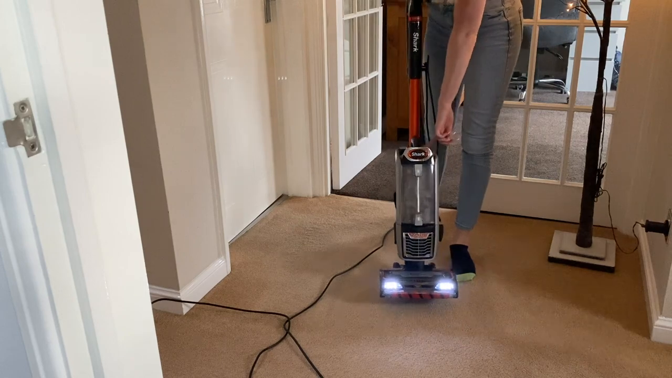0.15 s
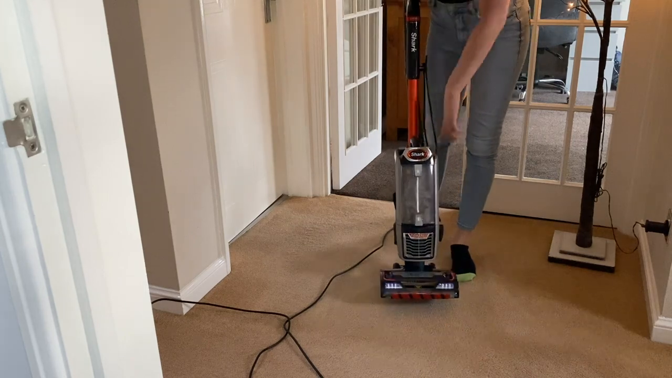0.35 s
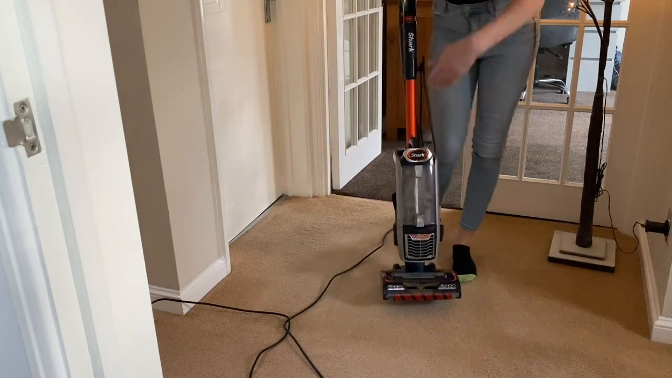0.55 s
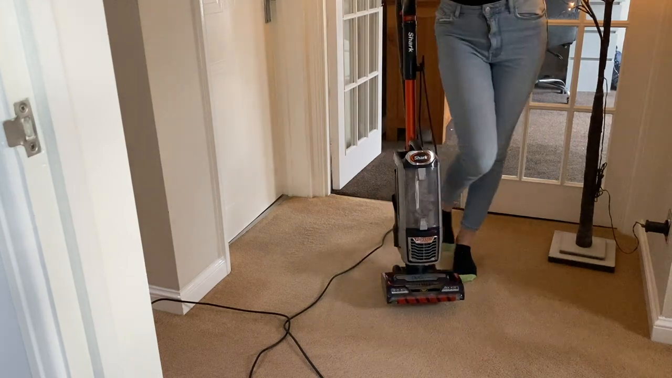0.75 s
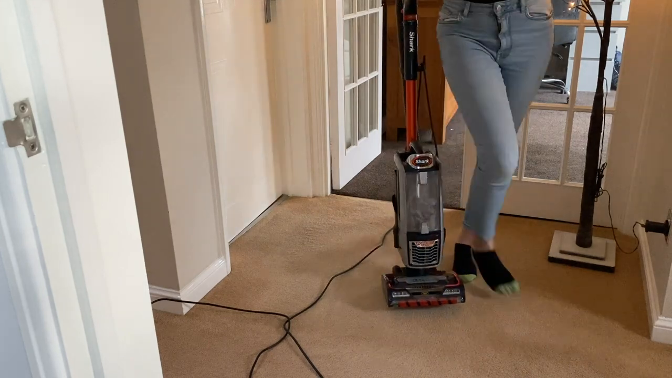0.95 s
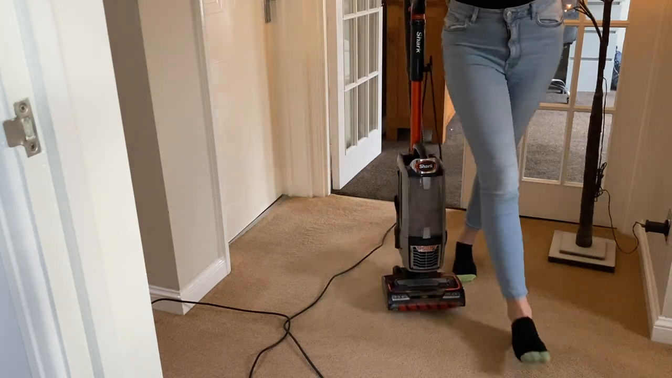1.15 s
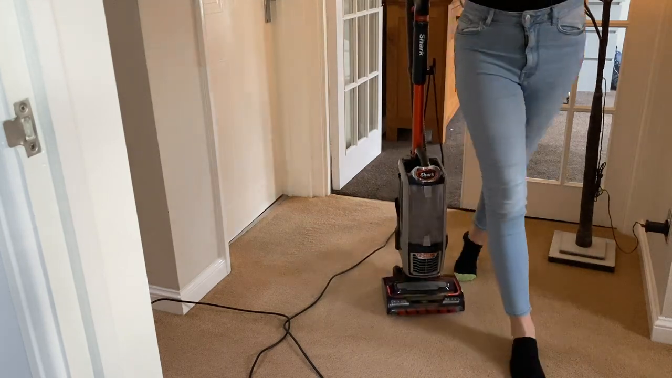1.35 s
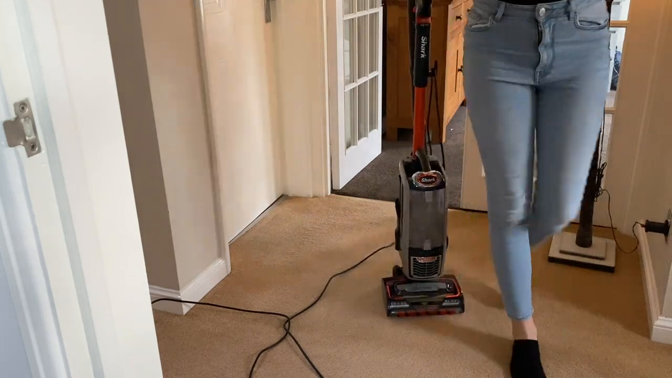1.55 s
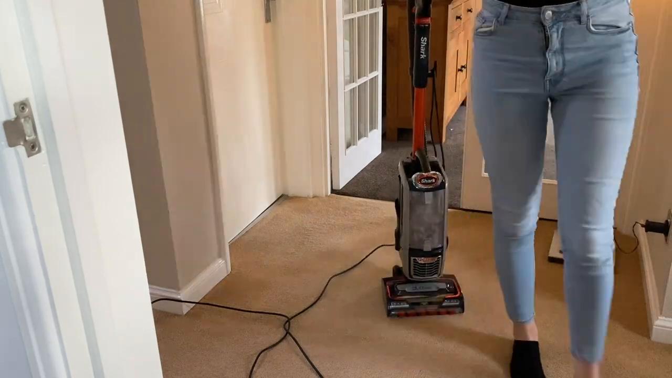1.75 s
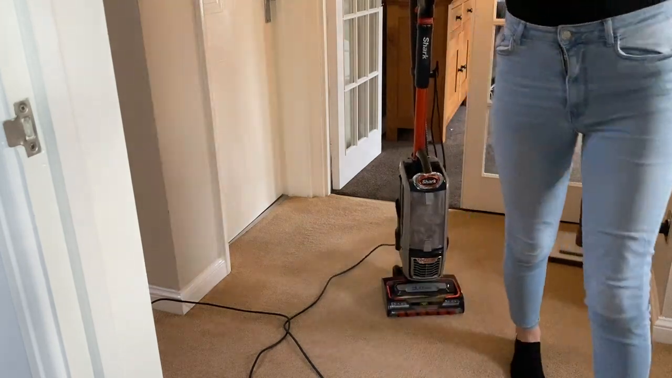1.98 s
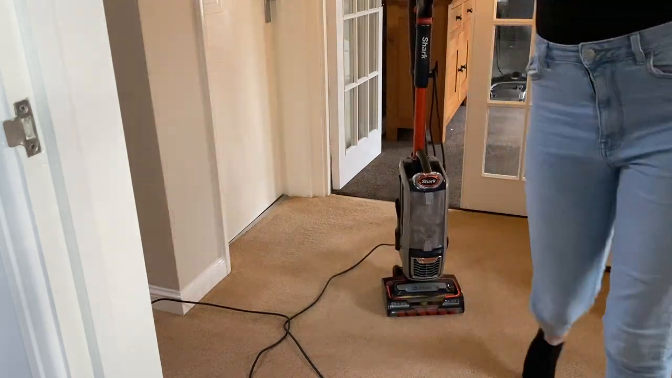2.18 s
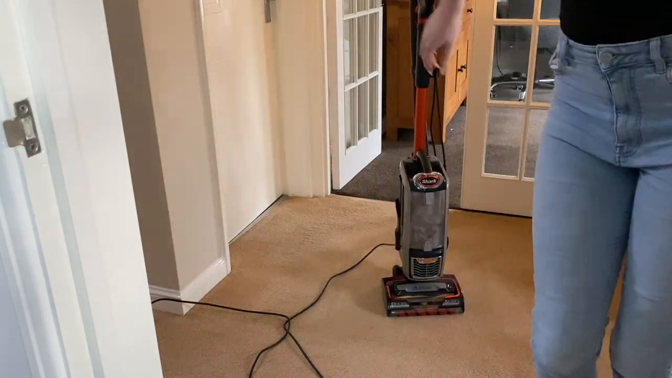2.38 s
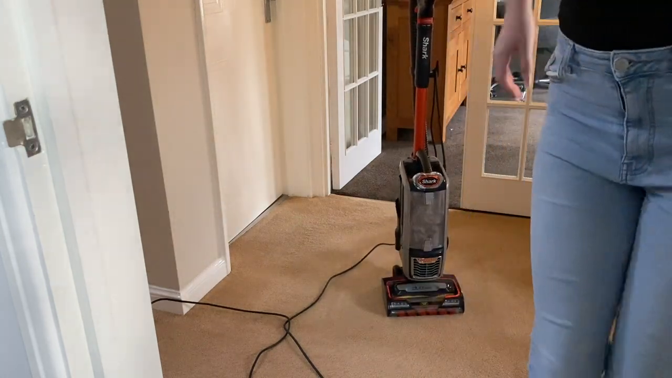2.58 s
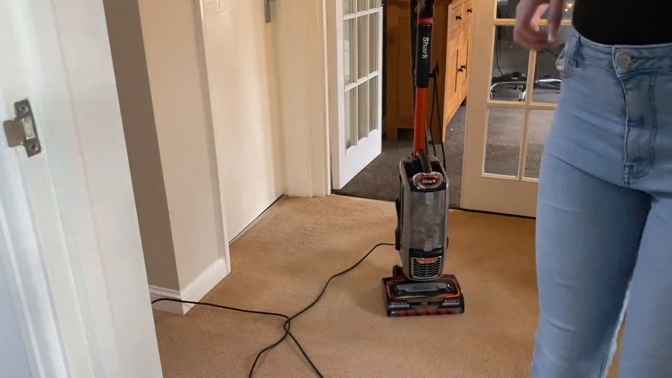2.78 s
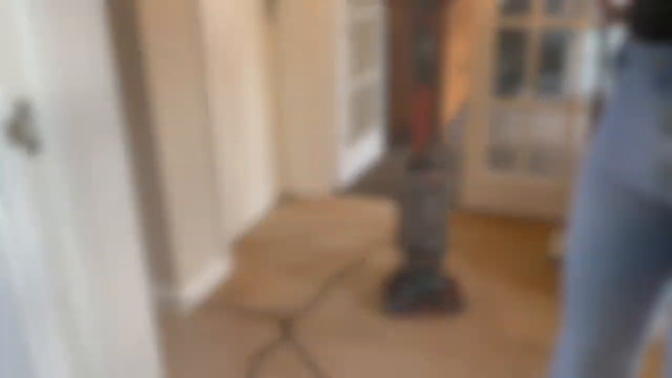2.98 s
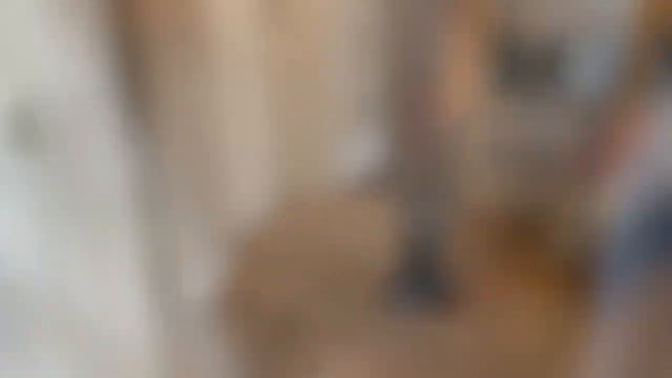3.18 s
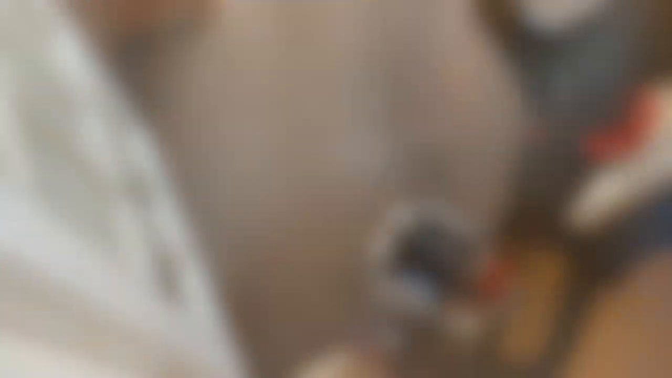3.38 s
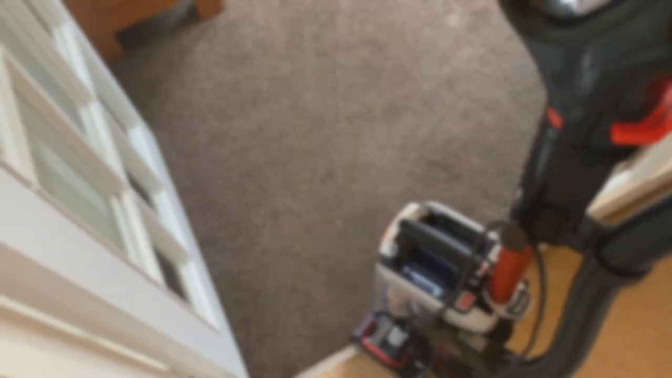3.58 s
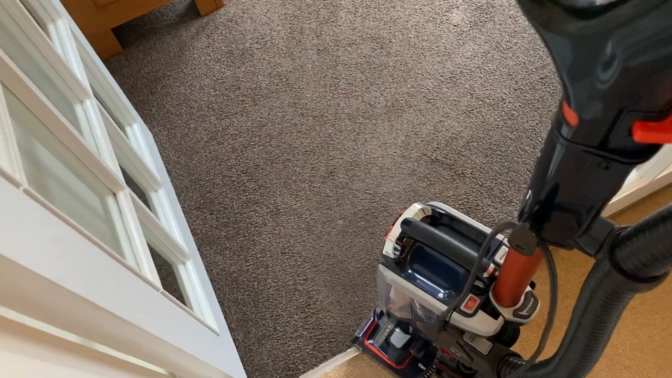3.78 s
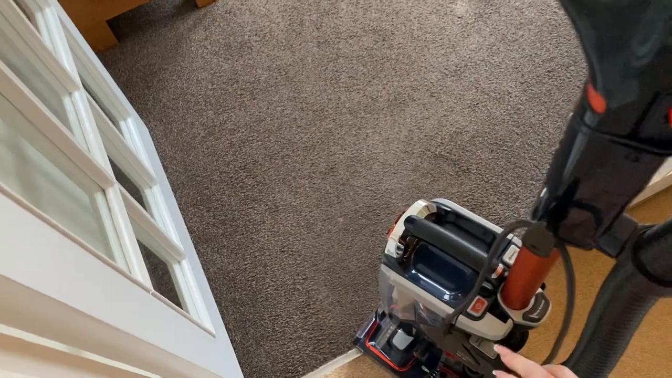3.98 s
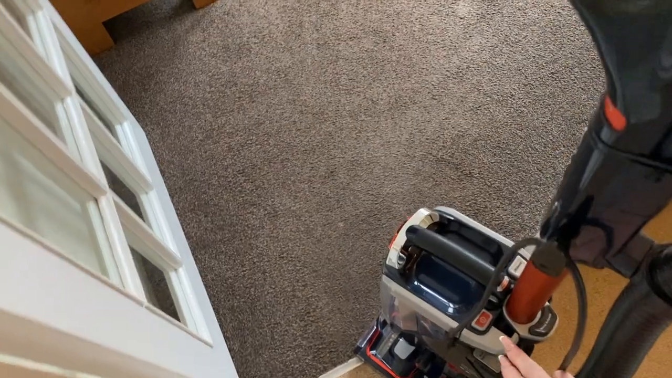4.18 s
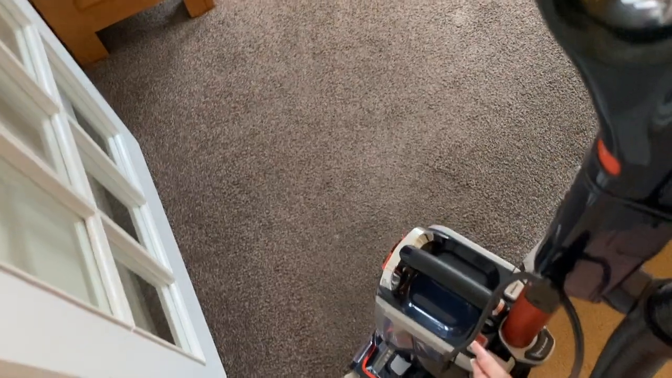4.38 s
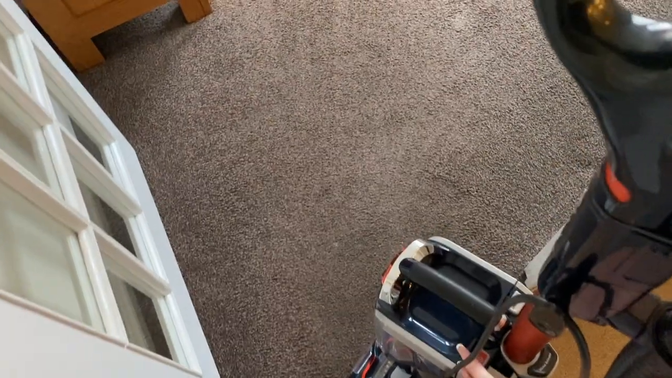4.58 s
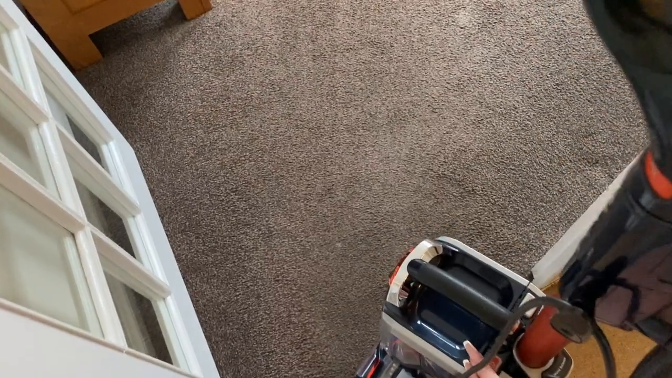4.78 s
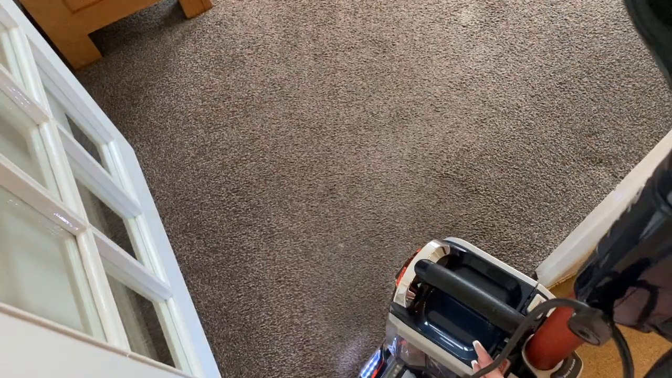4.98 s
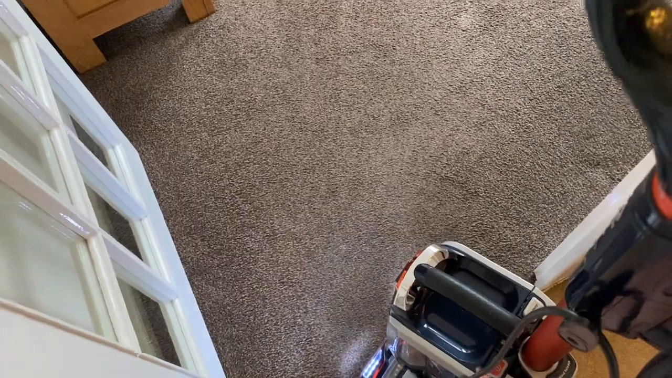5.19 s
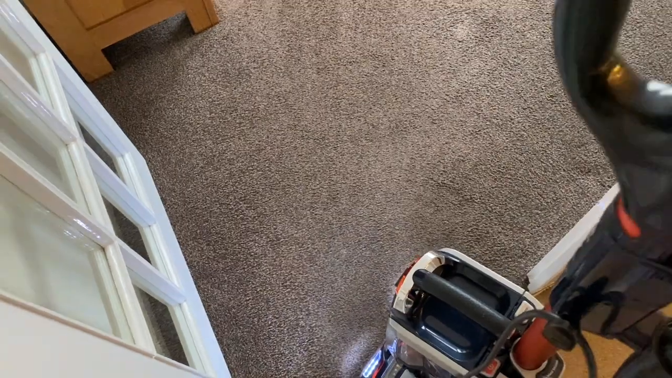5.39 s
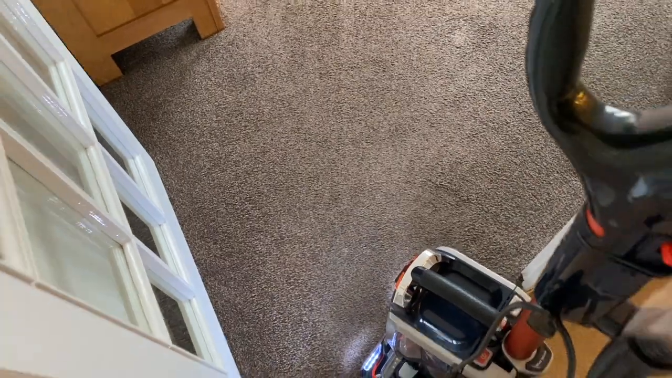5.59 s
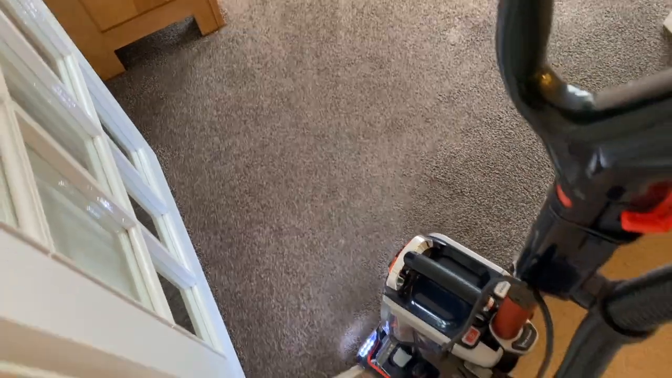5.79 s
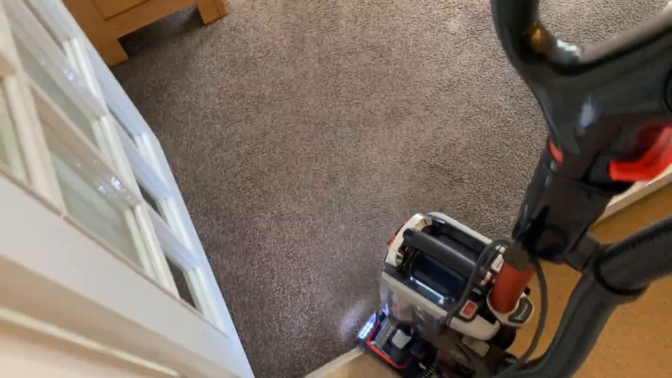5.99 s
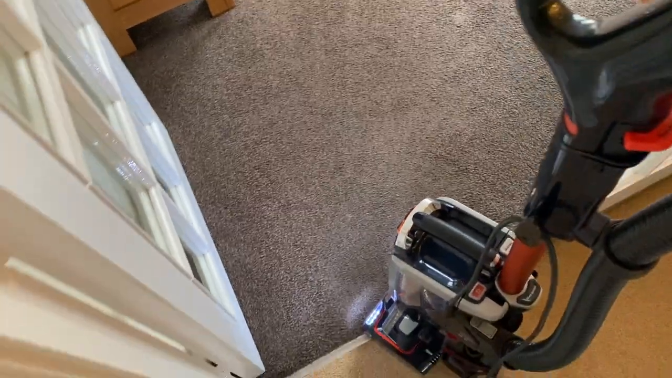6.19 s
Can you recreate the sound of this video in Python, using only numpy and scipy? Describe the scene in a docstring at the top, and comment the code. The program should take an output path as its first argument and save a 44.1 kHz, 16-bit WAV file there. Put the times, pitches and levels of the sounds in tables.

```python
"""An upright vacuum cleaner runs across a carpeted landing; switched off, its fan, rotor and air noise coast down
together, each tone tied to the shaft speed and each noise layer's level to it.
Jeans swish (grainy noise), a foot lands softly and something scuffs; then the switch clicks, plastic ringing.
The motor jolts into life and runs up to full speed, now heard from close above, with mains hum and rattle.
The still house lies beneath, as shaped noise."""
import sys
import numpy as np
from scipy import signal
from scipy.fft import rfft, irfft
from scipy.io import wavfile

SR = 44100
rng = np.random.default_rng(int(sys.argv[2]) if len(sys.argv) > 2 else 0)


def dump_mix(stems):
    """Bounce the given channels to the path in sys.argv[1] as a 16-bit WAV at rate SR."""
    frames = np.atleast_2d(stems).T  # one column per channel
    limited = np.clip(frames, -1, 1)  # hard clip at full scale
    pcm = np.round(limited * 32767).astype(np.int16)
    wavfile.write(sys.argv[1], SR, pcm)


N = 275625
T = np.arange(N) / SR
HZ = np.maximum(np.arange(N // 2 + 1) * SR / N, 1)
CUTOFF_HZ = 15900  # top of the microphone's range
SWITCH_OFF_S, SWITCH_ON_S = 0.1795, 4.801
# shaft speed before the switch-off (also the reference for levels), and after the restart
FULL_SPEED_HZ, RESTART_SPEED_HZ = 710.7, 714.7
BLADES = 9

# how alike left and right are, from across the landing and from close above: [f/Hz, likeness 0-1]
FAR_LIKENESS = [(130, 0.7), (300, 0.87), (640, 0.73), (1400, 0.74), (3100, 0.7), (6800, 0.14), (15000, 0)]
NEAR_LIKENESS = [(110, 1), (200, 0.94), (380, 0.63), (700, 0.079), (1300, 0.01), (2400, 0.27), (4400, 0.66),
                 (8000, 0.003), (15000, 0.13)]


def from_db(db):
    """Decibels to gain."""
    return 10 ** (np.asarray(db) / 20)


def rms_one(x):
    """Scale to unit power."""
    return x / np.sqrt(np.mean(x ** 2) + 1e-20)


def at_hz(points, hz=HZ):
    """Read a spectrum on a log-frequency axis."""
    f, value = np.transpose(points)
    return np.interp(np.log(hz), np.log(f), value)


def peaks_db(modes, at=HZ):
    """The lift, or cut where negative, that a set of resonances gives at each frequency, in dB."""
    return sum(db / (1 + (2 * (at - hz) / width) ** 2) for hz, width, db in modes)


def colour(x, gain):
    """Filter by a gain per frequency."""
    return irfft(rfft(x) * gain, N)


def drift(rate_hz):
    """Random wavering, mostly slower than the given rate; spread 1."""
    return rms_one(colour(rng.standard_normal(N), 1 / (1 + (HZ / rate_hz) ** 2)))


def noise(spectrum_db, likeness):
    """Stereo noise of a given colour and left-right likeness; rms 1."""
    mid, side = rfft(rng.standard_normal((2, N)))
    alike = np.clip(at_hz(likeness), -.99, .99)
    both = np.sqrt(1 + alike) * mid + np.sqrt(1 - alike) * side * [[1], [-1]]
    return rms_one(irfft(both * from_db(spectrum_db), N))


def balance(x, left_minus_right):
    """Share a level difference between the ears, half up on one and half down on the other."""
    return colour(x, from_db(at_hz(left_minus_right) * [[.5], [-.5]]))


def fall(age, t60):
    """Steady decay by 60 dB in t60 seconds."""
    return np.exp(-np.log(1000) * age / t60)


def dying(start, t60, rise):
    """Envelope of a blow: a quick rise (time constant in s), then a steady decay."""
    age = np.maximum(T - start, 0)
    return (1 - np.exp(-age / rise)) * fall(age, t60)


def landing(x, wet_db, t60=.33):
    """Direct sound plus dense wall reflections, different at each ear, which blur and flutter gliding tones."""
    age = T[:SR // 2]
    walls = rng.standard_normal((2, len(age))) * fall(age, t60) * (age > .003)
    # the walls dull the treble
    walls = signal.lfilter(*signal.butter(1, 6500, fs=SR), walls)
    walls *= from_db(wet_db) / np.sqrt(np.sum(walls ** 2, axis=1, keepdims=True))
    reflected = signal.fftconvolve(np.atleast_2d(x), walls, axes=1)[:, :N]
    return (x + reflected) / np.sqrt(1 + from_db(wet_db) ** 2)


def still_house():
    """The quiet of the house: steady noise, strongest in the bass."""
    # colour of the house [f/Hz, level/dB per Hz]
    house_air = [(25, -9.5), (60, 4.5), (120, -5.5), (250, -12.5), (500, -18), (900, -26), (4000, -31.5),
                 (11000, -30), (15000, -31)]
    return from_db(-70.5) * noise(at_hz(house_air), FAR_LIKENESS)


def footfall():
    """Heel, sole and toes strike the carpeted boards: three short bursts of low noise."""
    # heel, sole and toes [t/s, level/dB, t60/s]
    contacts = [(3.528, -46, 0.074), (3.547, -50.5, 0.14), (3.574, -59.5, 0.17)]
    # the boards under the carpet [f/Hz, level/dB per Hz]
    boards = [(40, -10), (110, 10.5), (220, 13), (330, 4), (520, -5.5), (900, -23), (2000, -50)]
    blows = sum(from_db(db) * dying(s, t60, rise=0.0018) for s, db, t60 in contacts)
    return blows * noise(at_hz(boards), NEAR_LIKENESS)


def tread():
    """The floor rumbles under the walker's weight, fading for a second until they stand still at 4.26 s."""
    walking = np.clip((4.26 - T) / 1, 0, 1)
    # colour of the rumble [f/Hz, level/dB per Hz]
    floor = [(12, -23.5), (30, 0.0), (55, 1), (100, -3.5), (250, -43.0), (1000, -68.5)]
    return from_db(-68.5) * walking * noise(at_hz(floor), FAR_LIKENESS)


def jeans():
    """Denim rubs on denim: noise that swells with each stroke, grainy as the weave catches and slips."""
    # strokes [t/s of the peak, level/dB, swell or fade/s]
    strokes = [(1.53, -62, 0.018), (2.3, -70.5, 0.17), (2.6, -65, 0.049), (2.87, -75, 0.086),
               (3.12, -77, 0.07), (3.77, -72, 0.103), (3.91, -66.5, 0.11), (4.33, -73.5, 0.049)]
    # colour of the cloth [f/Hz, level/dB per Hz]
    denim = [(650, -11.5), (1000, -3.5), (2000, -2), (4000, -4), (7000, -7.5), (11000, -5.5),
             (15000, -14.5)]
    power = sum((from_db(db) / (1 + ((T - s) / swell) ** 2)) ** 2 for s, db, swell in strokes)
    grain = from_db(1.3 * drift(70))
    return np.sqrt(power) * grain * noise(at_hz(denim), NEAR_LIKENESS)


def scuff():
    """Something slides close by: friction noise in one resonance that falls through the stroke."""
    peak_s, swell_s, level_db = 3.895, 0.045, -70
    centre_hz, width_hz, fall_hz_per_s = 1060, 260, 3300  # centre at the peak
    phase = 2 * np.pi * np.cumsum(centre_hz - fall_hz_per_s * (T - peak_s)) / SR
    band = drift(width_hz / 2) * np.sin(phase) + drift(width_hz / 2) * np.cos(phase)
    stroke = np.exp(-((T - peak_s) / swell_s) ** 2)
    return landing(from_db(level_db) * stroke * band, wet_db=-6)


def clicks(rows, modes):
    """Each snap is a brief noise burst that leaves the struck plastic ringing in its modes."""
    # colour of a snap on the shell [f/Hz, level/dB per Hz]
    shell = [(100, -39.5), (400, -9), (900, 1.5), (2200, 8.5), (3600, 6), (5500, -4.5), (7500, -1.5),
             (12000, -4.5), (16000, -21)]
    tilt_from_hz, strike_spread_db = 700, 2.5
    octaves_up = np.log2(np.maximum(HZ, tilt_from_hz) / tilt_from_hz)
    age = T[:SR // 5]
    out = 0
    for s, db, tilt_db, t60, ring_db in rows:
        snap = dying(s, t60, rise=0.00023) * noise(at_hz(shell) + tilt_db * octaves_up, NEAR_LIKENESS)
        first = int(s * SR)
        for hz, mode_db, mode_t60 in modes:
            # a random start, and up to half a cycle more at each ear
            phase = 2 * np.pi * (hz * age + rng.random() + rng.random((2, 1)) / 2)
            # each snap excites the modes a little differently
            strike = from_db(ring_db + mode_db + strike_spread_db * rng.standard_normal())
            snap[:, first:first + len(age)] += strike * fall(age, mode_t60) * np.sin(phase)
        out = out + from_db(db) * snap
    return landing(out, wet_db=-8.5, t60=0.28)


def switch():
    """Switch and plastic parts snap against the shell; the button springs back when let go."""
    # snaps, then button releases [t/s, level/dB, treble tilt/dB per octave, t60/s, ring/dB re snap]
    snaps = [(0.171, -33.5, 5, 0.19, -28), (1.812, -54, 0, 0.11, -23), (3.276, -70, 6, 0.045, -27),
             (4.179, -67.5, -12, 0.14, -22), (4.6025, -31.5, -1.5, 0.027, -14),
             (4.607, -44, -6, 0.028, -17), (4.622, -41.5, -8, 0.082, -15), (4.901, -28.5, 4, 0.03, -8.5),
             (5.05, -16.5, 1, 0.022, -27), (5.072, -26.5, -1.5, .03, -13), (5.998, -33, 2, .02, -31.5)]
    releases = [(4.713, -50, -7, 0.03, -13), (4.717, -47, -5.5, 0.021, -8)]
    # modes of the shell, then of the button [f/Hz, level/dB, t60/s]
    shell_modes = [(673, -15, 0.2), (883, -4, 0.17), (1230, -14, .09), (1642, -9, .24), (1798, -8, 0.14),
                   (2099, 1, 0.13), (2272, -5, 0.17), (2466, -11, 0.16), (3058, -8, 0.14),
                   (3200, -10, 0.12), (3750, -14, 0.08), (4167, -17, 0.12)]
    button_modes = [(1023, -9, .2), (1250, -3, .05), (1357, -5, .12), (1480, 0, .17), (2030, -4, .08),
                    (2207, -7, .15), (3100, -1, .04), (3650, -6, .035)]
    return clicks(snaps, shell_modes) + clicks(releases, button_modes)


def coast_speed():
    """Shaft Hz once the power is cut: air drag slows it at first, steady friction later."""
    drag_balance_hz, coast_s = 224.7, 3.3287  # speed where drag equals friction; time scale of slowing
    angle = np.arctan(FULL_SPEED_HZ / drag_balance_hz) - np.maximum(T - SWITCH_OFF_S, 0) / coast_s
    return np.maximum(drag_balance_hz * np.tan(angle), 50)


def start_speed():
    """Shaft Hz once the power is on: a quick pull and a slow settling close in on full speed."""
    # stages of the run-up [share of full speed, time constant/s]
    stages = [(.44, .038), (.52, .175), (.04, .38)]
    age = np.maximum(T - SWITCH_ON_S, 0)
    missing = sum(share * np.exp(-age / s) for share, s in stages)
    return np.maximum(RESTART_SPEED_HZ * (1 - missing), 50)


def by_speed(law, shaft_hz):
    """Gain of a layer that loses a set number of dB each time the speed halves."""
    db, loss_db = law
    return from_db(db + loss_db * np.log2(shaft_hz / FULL_SPEED_HZ))


def turning(shaft_hz, wobble):
    """Count the turns of a shaft whose speed wavers by a small share."""
    return np.cumsum(shaft_hz * (1 + wobble * drift(25))) / SR


def overtone(turns, shaft_hz, k):
    """A sine that sounds k times a turn; rms 1, fading out over the 2 kHz below the cutoff."""
    in_range = np.clip((CUTOFF_HZ - k * shaft_hz) / 2000, 0, 1)
    return np.sqrt(2) * np.sin(2 * np.pi * k * turns) * in_range


def airflow(shaft_hz, levels, spectrum, ducts, likeness, surge=0):
    """Turbulence coloured by the ducts: rumble at the floor head, rush in the bin, hiss at the exhaust."""
    air = noise(at_hz(spectrum) + peaks_db(ducts), likeness)
    low = 1 / (1 + (HZ / 220) ** 6)
    high = 1 / (1 + (2500 / HZ) ** 6)
    parts = {"rush": 1 - low - high, "rumble": low, "hiss": high}
    out = 0
    for name, part in parts.items():
        gain = by_speed(levels[name], shaft_hz) + surge * from_db(levels[name][0])
        out = out + gain * rms_one(colour(air, part))
    return out


def rotor(turns, shaft_hz, levels, wet_db, low_wet_db, scrape):
    """Unbalance sounds once a turn, the bearing sings, and a knock each turn rings the housing."""
    # resonances of the motor housing [f/Hz, width/Hz, level/dB]
    housing_modes = [(1124, 120, -14), (1722, 120, -10), (1925, 60, -3), (2022, 40, 0.5), (2193, 120, 2.5),
                     (2302, 51, 0.5), (2430, 89, -16), (2615, 120, -14.5), (2975, 170, -15.5)]
    # scrape of the carbon brushes [f/Hz, level/dB per Hz]
    brush_colour = [(400, -30), (800, -4.5), (1150, -11.5), (1600, -12.5), (2050, -4), (2300, 0.5),
                    (2600, -9), (3200, -13), (6000, -30.5)]
    # resonances of the body and of the bearing's seat, crossed by the tones [f/Hz, width/Hz, lift/dB]
    body = [(137.8, 7.6, 16), (152, 15, 19.5), (225, 95, 7), (330, 19, 11.5), (638, 52, 8)]
    bearing_seat = [(687, 52, 19.5), (960, 340, 23)]
    # relative overtones of the knock at each turn [multiple of shaft speed, level/dB]
    knock_overtones = [(3, -15), (6, -10), (7, 2), (8, 6.5), (9, -10), (10, 8), (11, 1), (12, 1), (13, 3),
                       (14, -2), (15, 0), (16, -4), (17, -4), (20, -12), (21, -12), (22, -4), (24, -12),
                       (33, -14)]
    bearing_order = 4.35  # cycles a turn

    def through(modes, k):
        """A shaft tone that swells as it crosses resonances."""
        return from_db(peaks_db(modes, k * shaft_hz)) * overtone(turns, shaft_hz, k)

    level = {name: by_speed(law, shaft_hz) for name, law in levels.items()}
    # the knock is uneven, so neighbouring overtones flare and fade at different moments
    flares = [from_db(1.5 * drift(14)) for _ in range(5)]
    knocks = sum(from_db(at_hz(knock_overtones, k)) * flares[k % 5] * overtone(turns, shaft_hz, k)
                 for k in range(3, 34))
    knocks = rms_one(knocks * np.sqrt(shaft_hz))
    ringing = sum(from_db(db) / (1 + (2 * (HZ - hz) / width) ** 2) for hz, width, db in housing_modes)
    # an irregular scrape, which takes over as the shaft slows
    rubbing = rms_one(colour(rng.standard_normal(N), from_db(at_hz(brush_colour))))
    brushes = scrape * np.sqrt(FULL_SPEED_HZ / shaft_hz) * rubbing
    housing = level["housing"] * from_db(-6.0) * (rms_one(colour(knocks, ringing)) + brushes)
    unbalance = level["unbalance"] * through(body, 1)
    bearing = level["bearing"] * through(bearing_seat, bearing_order)
    return landing(housing, wet_db, t60=0.25) + landing(unbalance + bearing, low_wet_db)


def whine(turns, shaft_hz, gains, flutter_db, flutter_hz, lag_s):
    """The fan blades' tone and its overtones, each fluttering, a little later at the left ear."""
    at_ears = turns - shaft_hz * lag_s * np.array([[1], [0]])
    partials = 0
    for k, gain in enumerate(gains, 1):
        flutter = from_db(flutter_db * drift(flutter_hz))
        partials = partials + gain * flutter * overtone(at_ears, shaft_hz, BLADES * k)
    # the blades stop whining below a shaft speed of about 97 Hz
    return partials / (1 + (97 / shaft_hz) ** 16)


def coasting():
    """The machine across the landing: it runs, loses power and slows to rest; the walls blur its whine."""
    # colour of the air noise [f/Hz, level/dB per Hz]
    far_air = [(30, -27.5), (60, -11.5), (110, -14), (170, -5.5), (350, -2), (600, -5), (1100, -6),
               (1800, -9), (2600, -11), (4500, -18), (7000, -17), (11500, -21), (15000, -39.5)]
    # resonances of ducts, bin, exhaust and room [f/Hz, width/Hz, lift/dB]
    far_ducts = [(148.4, 15, 14), (234.2, 7.5, 12), (353.4, 45, 8.5), (442, 25, 1), (600.4, 26, 5.5),
                 (908, 44, 3), (1080, 420, 3.5), (1540, 11, 10.5), (2570, 58, 6.5), (4410, 1200, 10.5)]
    # left minus right [f/Hz, difference/dB]
    far_balance = [(60, -0.5), (150, -2.5), (380, -1), (950, -2), (2380, 2.5), (5980, 2.5), (15000, -2)]
    # blade tone and its overtones in order, ahead of the fan case [level/dB at full speed, dB lost per halving]
    far_whine = [(-62, 7), (-69.5, -0.5), (-73.5, 2.5), (-79, 1.5), (-77.5, 5), (-83, 6)]
    # peaks and nulls of the fan case [f/Hz, width/Hz, lift/dB]
    fan_case = [(1970, 260, 5), (2360, 180, 13), (2620, 76, -5), (3000, 140, -9), (3700, 130, -2),
                (4270, 800, 14), (5800, 600, -5), (8000, 1600, 3.5), (10700, 1700, 15.5), (12820, 150, 10),
                (14600, 2800, -11)]
    # layers ahead of resonances and housing cut: name: [level/dB at full speed, dB lost per halving]
    far_levels = {"rush": (-30.5, 13.18), "rumble": (-45.5, 11.3), "hiss": (-44, 15.36),
                  "unbalance": (-45.5, 13.1), "bearing": (-69, 6.6), "housing": (-51, 2.34)}
    shaft_hz = coast_speed()
    turns = turning(shaft_hz, wobble=.0009)
    air = airflow(shaft_hz, far_levels, far_air, far_ducts, FAR_LIKENESS)
    motor = rotor(turns, shaft_hz, far_levels, wet_db=-5.5, low_wet_db=-9.5, scrape=0.19)
    gains = []
    for k, law in enumerate(far_whine, 1):
        partial_hz = BLADES * k * shaft_hz
        gain = by_speed(law, shaft_hz) * from_db(peaks_db(fan_case, partial_hz))
        if k >= 3:  # the case passes these only above about 6.2 kHz
            gain = gain / (1 + (6200 / partial_hz) ** 6)
        gains.append(gain)
    blades = whine(turns, shaft_hz, gains, flutter_db=2.2, flutter_hz=35, lag_s=1.2e-5)
    blades = landing(blades, wet_db=-1.5, t60=.28)
    # the last rub of the rotor dies away over 0.56 s
    to_rest = np.clip((3.58 - T) / 0.56, 0, 1)
    return balance(air + motor + blades, far_balance) * to_rest


def starting():
    """The machine from above: the inrush of current hums and jolts the body while the fan gathers speed."""
    # colour of the air noise [f/Hz, level/dB per Hz]
    near_air = [(30, -29.5), (55, -4), (90, -4.5), (200, -2.5), (350, -4), (600, -5), (1100, -7.5),
                (2000, -10.5), (3200, -11), (5000, -13.5), (7500, -18.5), (11500, -20.5), (15000, -31)]
    # resonances of ducts, bin, exhaust and room [f/Hz, width/Hz, lift/dB]
    near_ducts = [(80.5, 15, 11), (155.4, 24, 10.4), (195.4, 14, 6.5), (315, 21.6, 6.1), (370, 54, 6.7),
                  (509.3, 22, 9.8), (694, 55, 4.3), (936, 29, 7.1), (1430, 250, 3.2), (1980, 160, 4.1),
                  (2360, 51, 5.6), (2890, 59, 1.6)]
    # left minus right [f/Hz, difference/dB]
    near_balance = [(35, -2), (80, -3), (130, 3), (290, -3.5), (640, -1), (1410, 1.5), (3100, 2.5),
                    (6820, 1.5), (15000, -1)]
    # the whistle swells and fades as the microphone moves over the machine
    # [t/s, blade tone level/dB, its octave's level/dB]
    near_whine = [(4.82, -68, -68), (4.885, -66, -52), (4.91, -66, -60), (4.945, -61, -51.5),
                  (5.06, -48.5, -54), (5.13, -63, -58), (5.23, -65, -48.5), (5.32, -54, -53),
                  (5.47, -55, -64), (5.59, -49.5, -58), (5.7, -56, -55), (5.79, -56, -52), (5.93, -58, -57),
                  (6.1, -52, -56), (6.22, -58, -55)]
    # layers ahead of resonances and housing cut: name: [level/dB at full speed, dB lost per halving]
    near_levels = {"rush": (-31.5, 12.4), "rumble": (-45, 3), "hiss": (-41.5, 17), "unbalance": (-46.5, 5),
                   "bearing": (-55, 9.9), "housing": (-57.5, 6)}
    # mains hum once the inrush is over [f/Hz, level/dB]
    mains_hum = [(100, -48.5), (200, -57.5), (300, -52), (400, -81)]
    # colour of the rattling shell [f/Hz, level/dB per Hz]
    rattle_colour = [(200, 0.5), (900, 7.0), (1700, 2), (2600, -7), (9000, -30)]
    shaft_hz = start_speed()
    # the switch-on surge shakes the ducts, in dB against the running air noise
    surge = from_db(7.5) * dying(SWITCH_ON_S, t60=0.21, rise=0.00092)
    air = airflow(shaft_hz, near_levels, near_air, near_ducts, NEAR_LIKENESS, surge)
    turns = turning(shaft_hz, wobble=0.00092)
    motor = rotor(turns, shaft_hz, near_levels, wet_db=-7, low_wet_db=-14.0, scrape=1.4)
    times, *whine_db = np.transpose(near_whine)
    gains = [from_db(np.interp(T, times, db)) for db in whine_db]
    blades = whine(turns, shaft_hz, gains, flutter_db=2, flutter_hz=30, lag_s=2.7e-5)
    inrush = 1 + 4 * dying(SWITCH_ON_S, t60=1.0, rise=0.04)
    hum = inrush * sum(from_db(db) * np.sqrt(2) * np.sin(2 * np.pi * (hz * T + rng.random()))
                       for hz, db in mains_hum)
    # the first surges of torque rattle the shell twice each mains cycle
    torque = 1 + 0.27 * np.sin(2 * np.pi * mains_hum[0][0] * T)
    rattle = from_db(-22.0) * dying(4.813, t60=0.42, rise=0.0063) * torque
    rattle = rattle * noise(at_hz(rattle_colour), NEAR_LIKENESS)
    jolt = from_db(-25) * dying(4.829, t60=0.26, rise=0.0015) * np.sin(2 * np.pi * 112 * T)
    powered = np.clip((T - SWITCH_ON_S) / 0.038, 0, 1)
    return balance((air + motor + blades + hum + rattle + jolt) * powered, near_balance)


def scene():
    """Machine, switch and walker over the quiet of the house."""
    walker = footfall() + tread() + jeans()
    machine = coasting() + starting()
    return still_house() + walker + scuff() + switch() + machine


def record(dry):
    """The microphone loses the deepest bass; the top is cut steeply."""
    dry = signal.sosfilt(signal.butter(2, 31, "high", fs=SR, output="sos"), dry)
    return signal.sosfilt(signal.ellip(10, .1, 80, CUTOFF_HZ, fs=SR, output="sos"), dry)


dry = scene()
out = record(dry)
dump_mix(out)
```